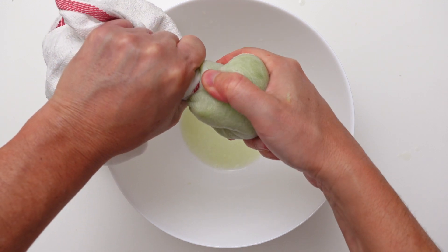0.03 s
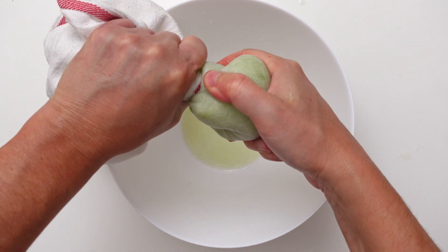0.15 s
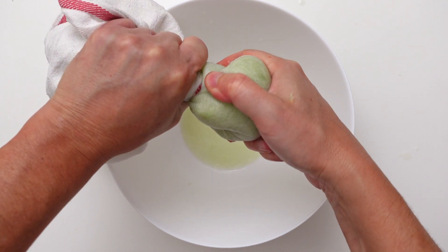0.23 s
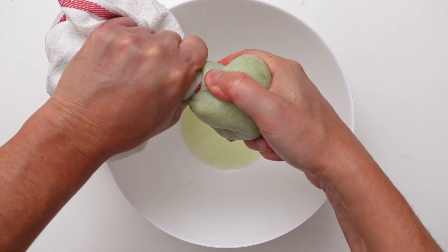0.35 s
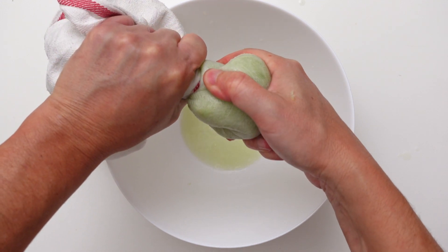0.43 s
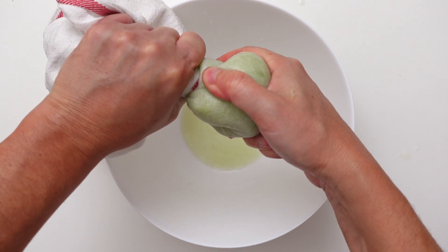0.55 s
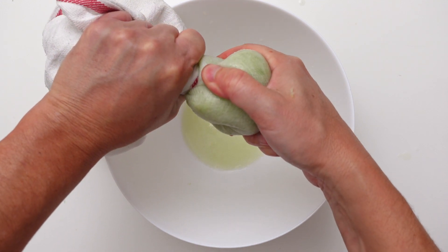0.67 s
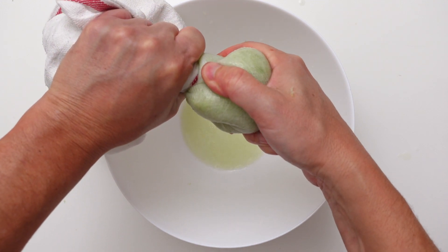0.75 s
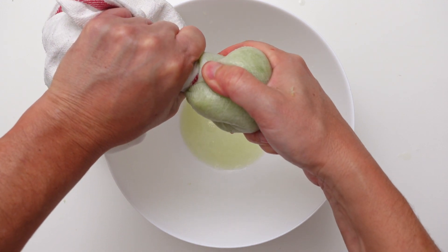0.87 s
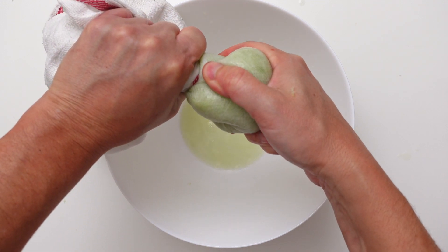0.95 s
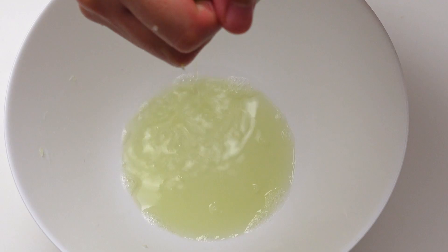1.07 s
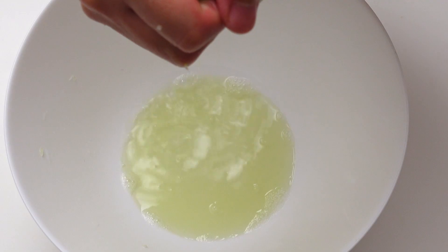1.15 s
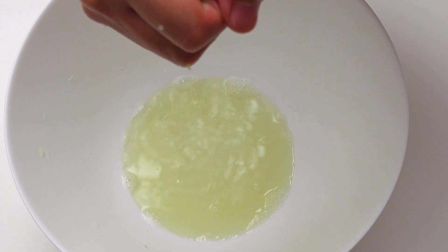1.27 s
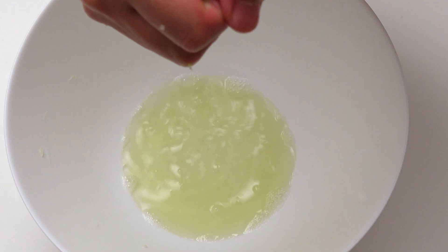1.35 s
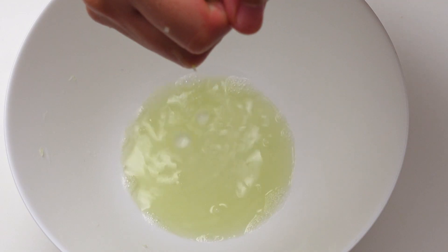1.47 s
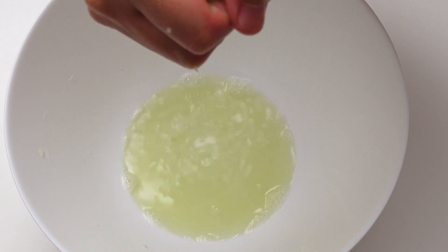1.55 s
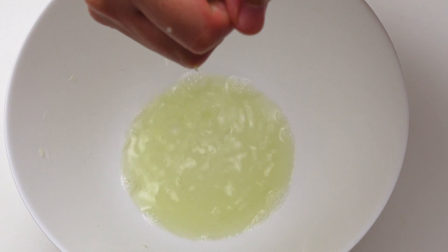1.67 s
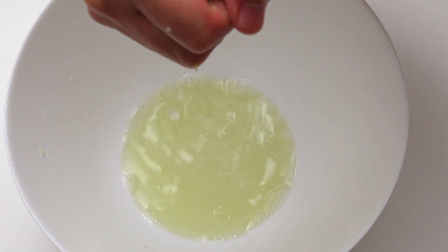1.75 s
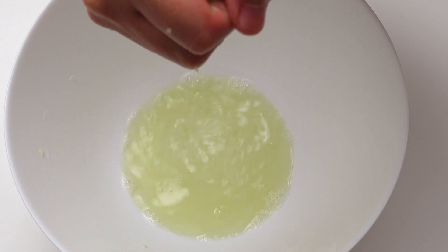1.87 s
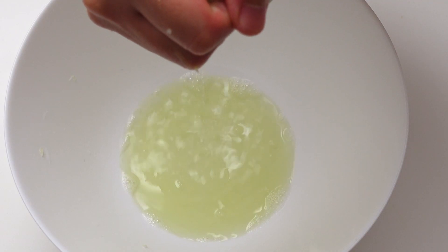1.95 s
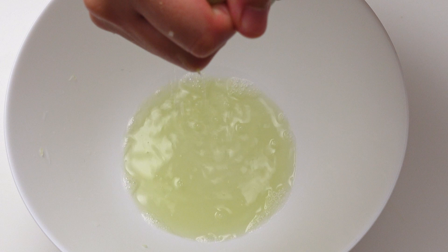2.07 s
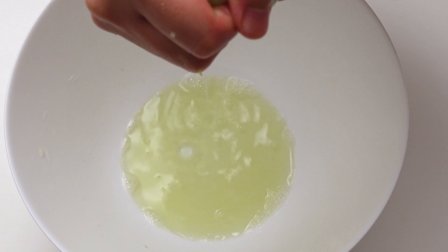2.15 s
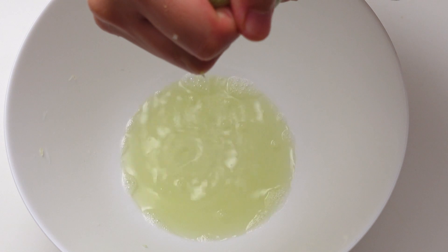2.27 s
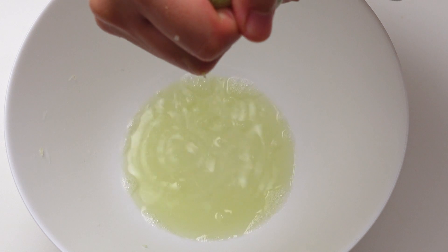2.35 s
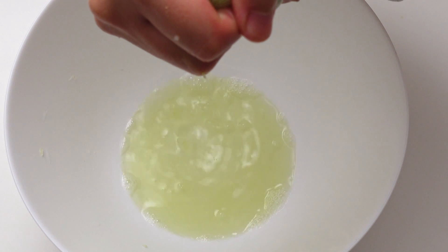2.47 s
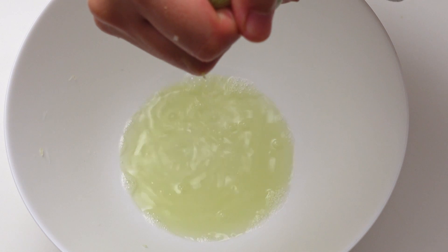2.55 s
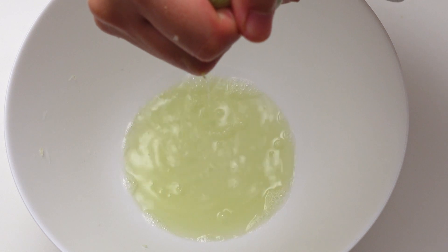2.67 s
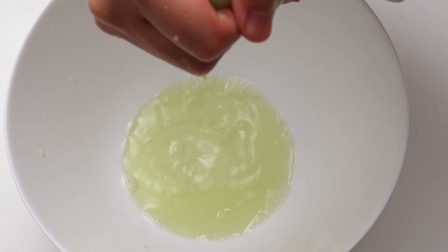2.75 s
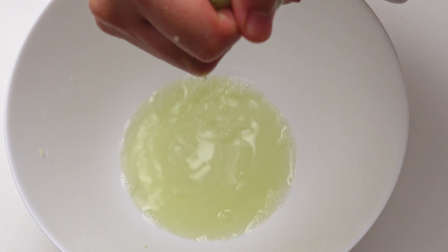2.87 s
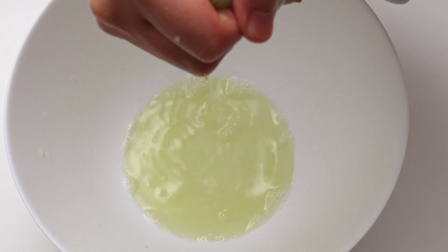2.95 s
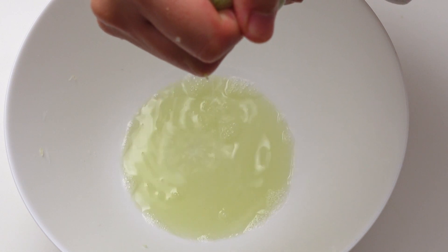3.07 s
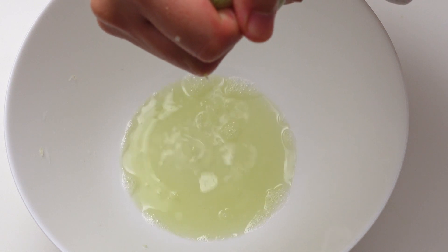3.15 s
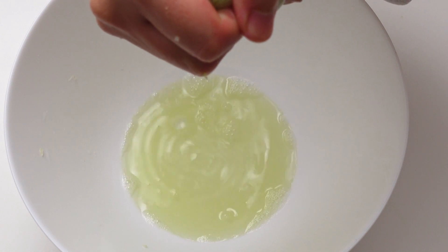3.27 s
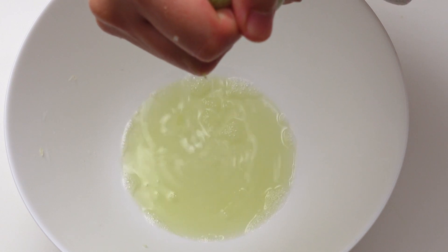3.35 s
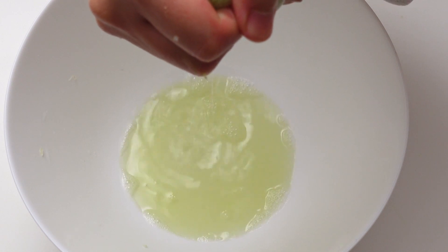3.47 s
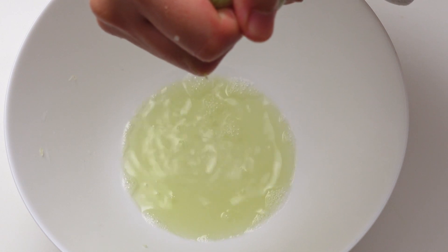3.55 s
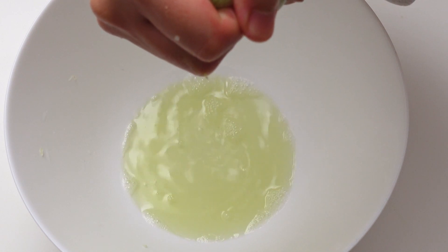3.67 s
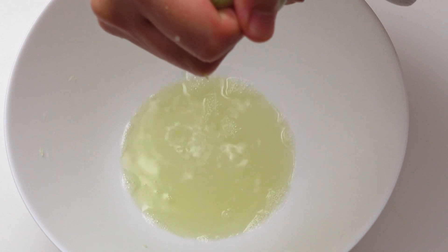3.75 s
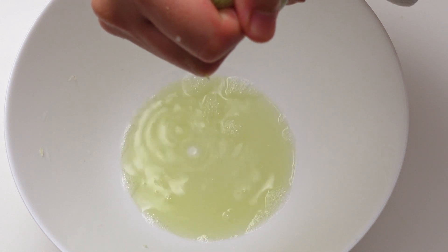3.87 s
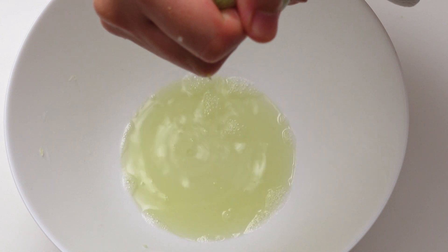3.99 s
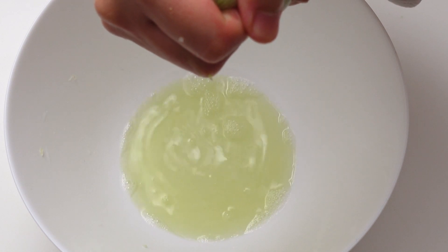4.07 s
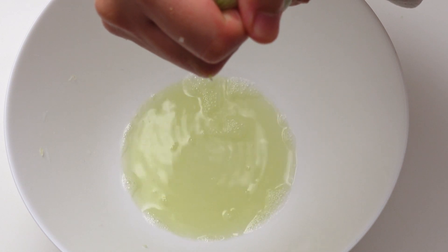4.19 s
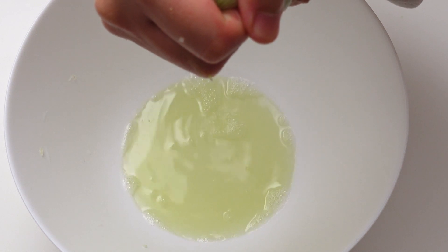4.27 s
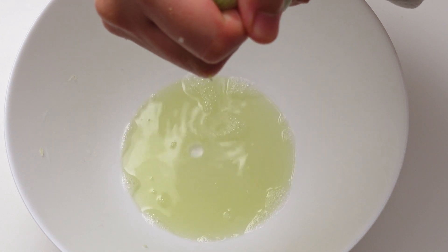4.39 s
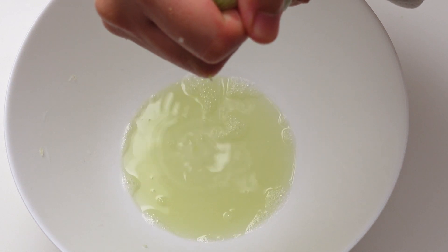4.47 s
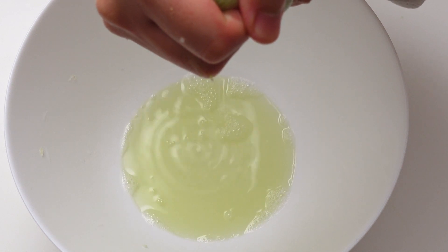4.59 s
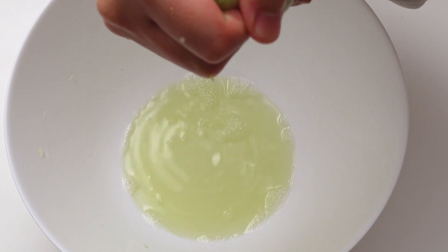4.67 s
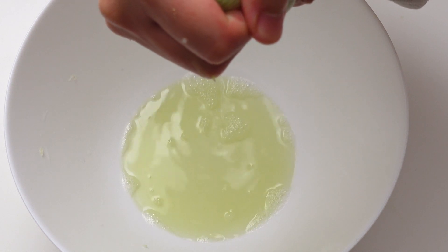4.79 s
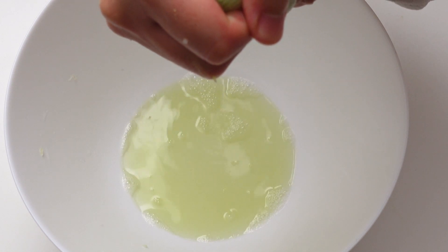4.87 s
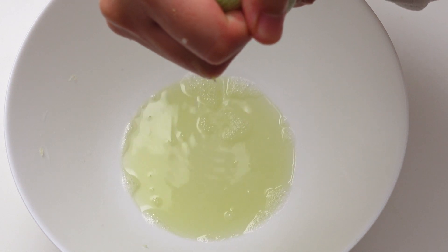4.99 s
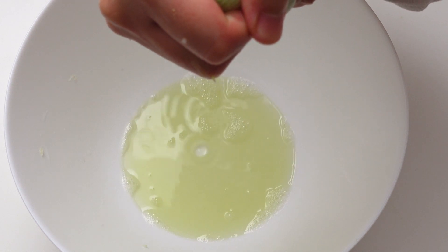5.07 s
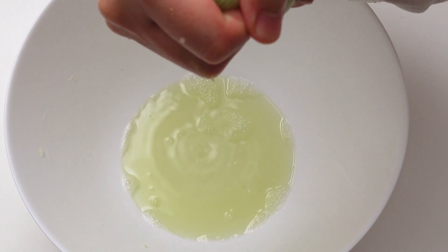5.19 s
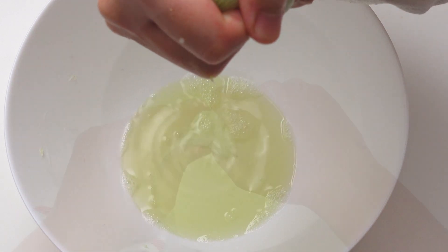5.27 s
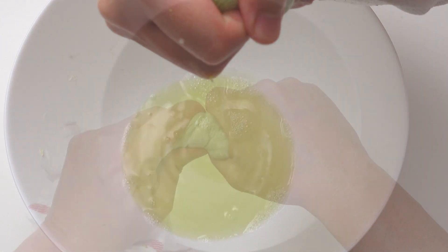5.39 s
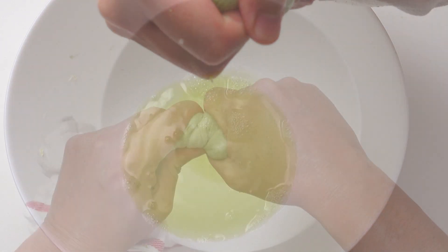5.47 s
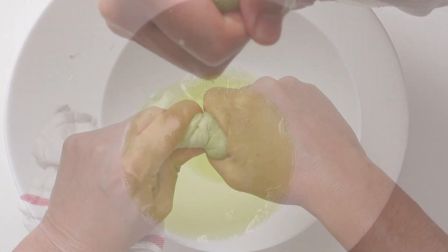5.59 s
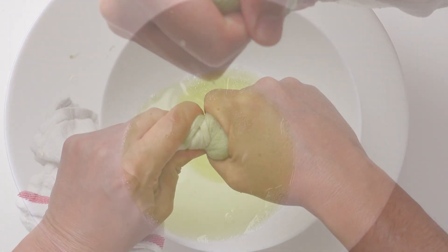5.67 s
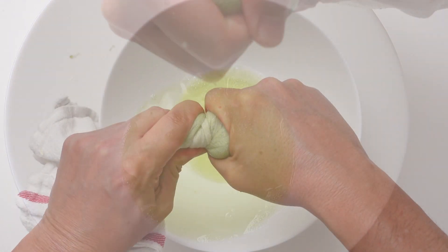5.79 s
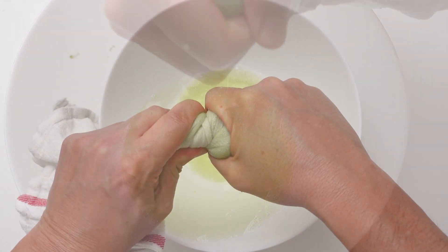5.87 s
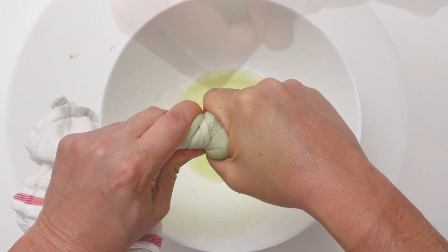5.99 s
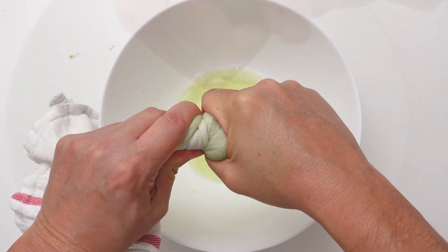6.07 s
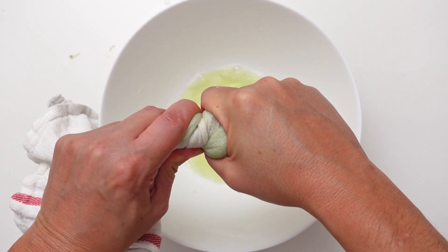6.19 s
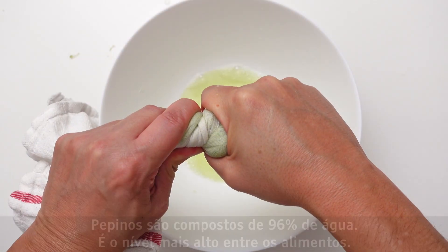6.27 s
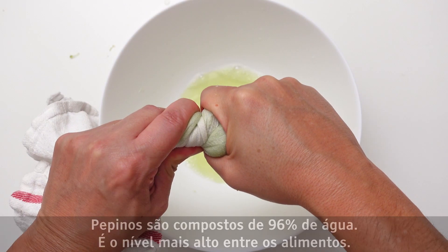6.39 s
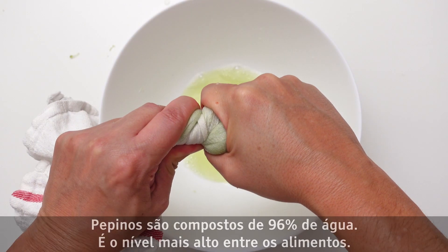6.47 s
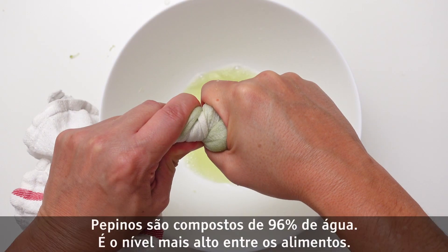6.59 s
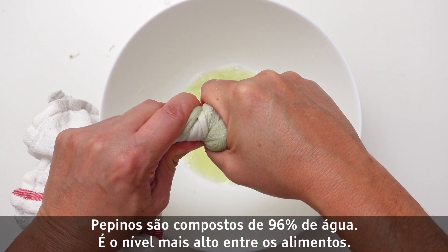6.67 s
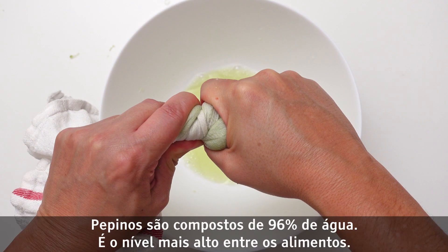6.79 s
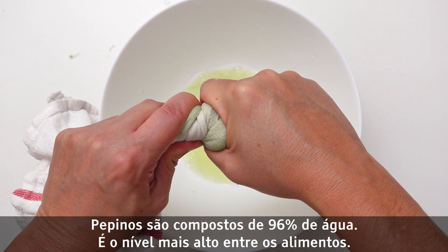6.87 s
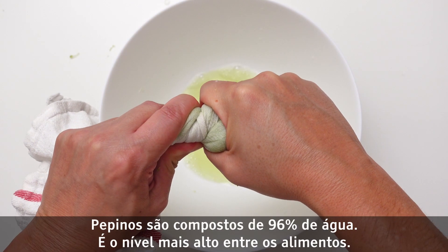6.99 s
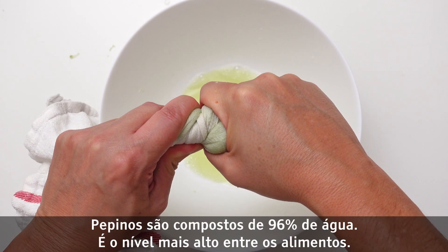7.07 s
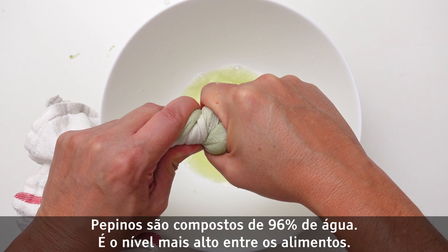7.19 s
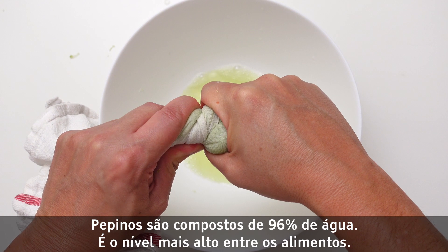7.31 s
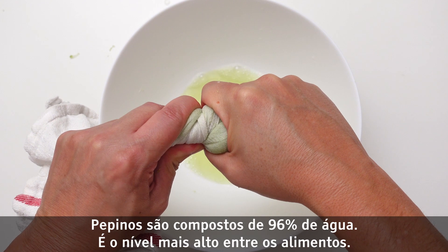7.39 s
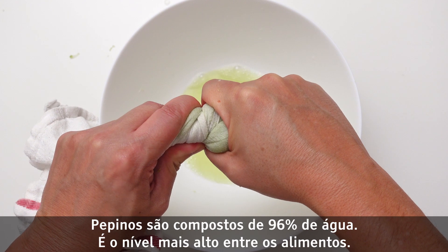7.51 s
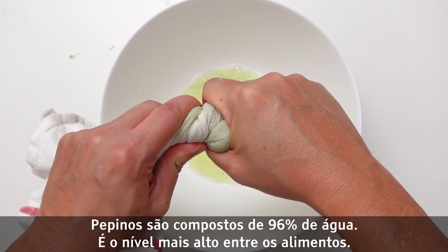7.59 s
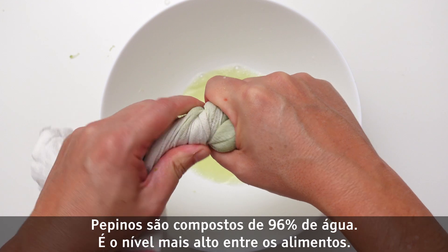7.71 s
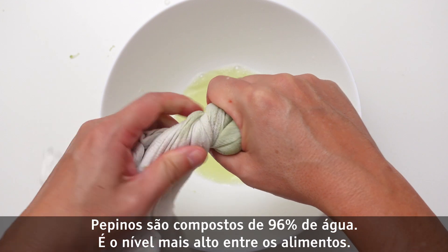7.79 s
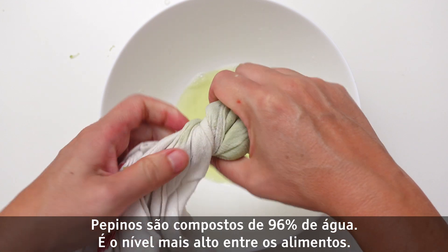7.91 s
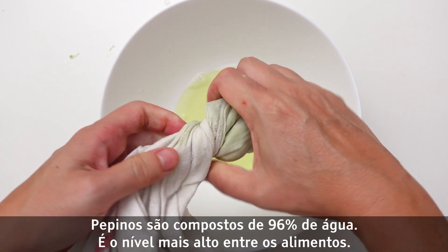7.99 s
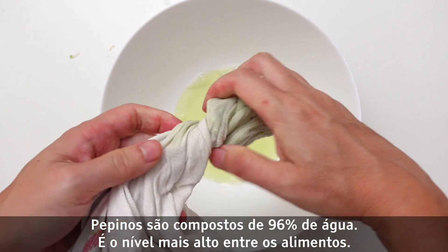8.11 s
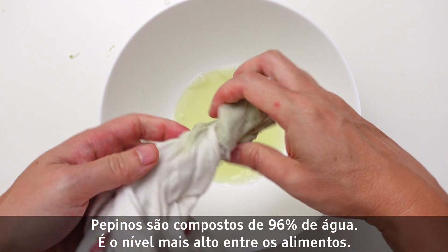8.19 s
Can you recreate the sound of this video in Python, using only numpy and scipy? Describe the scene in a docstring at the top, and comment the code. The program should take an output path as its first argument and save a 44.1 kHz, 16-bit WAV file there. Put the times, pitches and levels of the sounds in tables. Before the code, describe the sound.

Juice wrung from a wet cloth drips into a china bowl: first sparse ticks and one crisp double plop, then bursts of trickling that become a steady, crowded patter of high bubbly plops. It thins to isolated ticks, then cloth and hands shift softly at the end. Small room, short reflections, faint hush, close microphone strongly favouring the left channel.

```python
"""In a small kitchen, grated cucumber is wrung in a cloth over a china bowl and, at the end, untwisted.
Juice falls into the pool and traps bubbles: some plop at a nearly steady pitch, others chirp upward.
Plops knock the bowl into ringing tones, stray drops tick on the china and tiny beads burst.
Shaped noise makes the rustling cloth, the sliding hands, the shuddering worktop and the room.
The microphone feeds mostly the left channel."""
import sys
import numpy as np
from scipy import signal
from scipy.fft import rfft, irfft, next_fast_len
from scipy.io import wavfile
from scipy.ndimage import uniform_filter1d, minimum_filter1d

SR = 44100
rng = np.random.default_rng(int(sys.argv[2]) if len(sys.argv) > 2 else 0)


def dump_mix(stems):
    """Bounce the given channels to the path in sys.argv[1] as a 16-bit WAV at rate SR."""
    frames = np.atleast_2d(stems).T  # one column per channel
    limited = np.clip(frames, -1, 1)  # hard clip at full scale
    pcm = np.round(limited * 32767).astype(np.int16)
    wavfile.write(sys.argv[1], SR, pcm)


N = 363809
TIME = np.arange(N) / SR
CUTOFF_HZ = 16200   # top of the sound
CHIRP_RISE = 0.8    # octaves that a chirp climbs

# ringing tones of the china; the lowest two start higher and sink to these pitches:
# (pitch [Hz], relative level [dB], time to fade by 60 dB [s])
CHINA_MODES = [(2155, -1.5, 0.085), (3720, -7.5, 0.096), (5810, -5, 0.05), (6570, -5.5, 0.044),
               (6980, -6, 0.1), (8530, -5.5, 0.046)]
# each squeeze starts a gush that holds steady, then dries up: (start [s], end [s], level [dB])
SQUEEZE_GUSHES = [(1.263, 1.46, -48.5), (1.774, 2.048, -46), (2.177, 2.86, -46.5), (2.93, 5.004, -41),
                  (5.117, 5.599, -54)]
# bubbles of nearly steady pitch, low or high:
# (time [s], level [dB], starting pitch [Hz], life [ms])
STEADY_PLOPS = [(0.8343, -12.5, 3390, 2.2), (0.8388, -18.5, 3930.0, 1.15), (1.1937, -27.5, 2760, 0.99),
                (1.4049, -27, 6840, 1.2), (1.4903, -32.5, 5700, 0.87), (1.7042, -35, 1340, 11),
                (1.7328, -24, 3590, 2.4), (1.769, -34.5, 1377, 7.6), (1.891, -34, 2980, 4.4),
                (1.9396, -15, 2416, 3), (1.9837, -37.5, 3560, 2.9), (2.0039, -22.5, 3860, 2.5),
                (2.0034, -26.5, 6600, 2.9), (2.1946, -28.5, 3650, 4.6), (2.1949, -23, 2420, 2.9),
                (2.2333, -15, 8000, 0.33), (2.2561, -23.5, 3670, 2.2), (2.2562, -21.5, 2240, 5.1),
                (2.288, -33.5, 1580, 6.6), (2.3087, -29.5, 3640.0, 3.3), (2.3226, -26.5, 3624, 2.3),
                (2.3757, -25.5, 2187, 4.0), (2.431, -38, 1205.0, 7.6), (2.502, -40, 4000, 5.0),
                (2.5057, -33, 8400, 1.0), (2.606, -36, 3900, 2.7), (2.6511, -21.5, 1973, 5.6),
                (2.7791, -25.5, 2060, 4.5), (2.925, -28, 2086, 5.7), (2.9552, -27, 2100, 8.2),
                (2.968, -22, 2080, 3), (2.968, -16.5, 4270, 0.53), (3.0548, -23.5, 5300, 2.8),
                (3.1617, -19, 1893, 2.2), (3.2639, -26.0, 2360, 1.8), (3.3673, -21.5, 2175, 3.5),
                (3.3783, -33, 2080, 4.3), (3.3869, -17, 8000, 0.48), (3.5755, -26.5, 2130.0, 2.24),
                (3.69, -29, 1924, 3.1), (3.7906, -22.0, 2750, 3.6), (3.8476, -31.5, 1900.0, 6.1),
                (3.8663, -25.5, 2080, 3.4), (3.9517, -29.5, 2200, 5.8), (3.9695, -23, 2940, 1.05),
                (4.0428, -26.5, 5230, 2), (4.1104, -31.5, 2100, 6.3), (4.1997, -32, 1980, 4.6),
                (4.3099, -30.5, 2130, 6.7), (4.4436, -31.5, 2235, 6.2), (4.541, -35, 3700, 7.9),
                (4.5496, -28.5, 1680, 6.0), (4.705, -29.5, 5980, 2.6), (4.7663, -26.5, 1912, 8),
                (4.9232, -25.5, 4995, 3), (5.1031, -27, 3610, 1.54), (5.1321, -33, 2245, 12.7),
                (5.1816, -22.5, 6960, 2.4), (5.196, -21.5, 6430, 2.2), (5.263, -31, 6730, 1.6),
                (5.2763, -24.0, 5400, 1.7), (5.578, -38.5, 5250, 5), (5.5908, -37.5, 4310, 3.3),
                (6.1077, -21.5, 2070, 4.6), (6.86, -49.5, 1526, 9.0)]


def from_db(db):
    """Turn decibels into a gain."""
    return 10 ** (np.asarray(db) / 20)


def rms_one(x):
    """Scale a sound to an average strength (rms) of 1."""
    return x / np.sqrt(np.mean(x ** 2) + 1e-20)


def add(track, s, sound):
    """Mix a sound into a track at time s."""
    start = int(np.clip(s * SR, 0, N - 1))
    track[start:start + len(sound)] += sound[:N - start]


def high_pass(x, order, hz):
    """Remove what lies below a frequency."""
    return signal.sosfilt(signal.butter(order, hz, "high", fs=SR, output="sos"), x)


def band(x, low_hz, high_hz):
    """Keep what lies between two frequencies."""
    edges = [low_hz, min(high_hz, SR / 2 - 1)]
    return signal.sosfilt(signal.butter(2, edges, "band", fs=SR, output="sos"), x + 1e-18)


def resonate(x, hz, width):
    """Pass a sound through one resonance, with gain 1 at its peak and its width in Hz."""
    r = np.exp(-np.pi * width / SR)
    feed = np.array([1, 0, -1]) * (1 - r * r) / 2
    feedback = [1, -2 * r * np.cos(2 * np.pi * hz / SR), r * r]
    return signal.lfilter(feed, feedback, x + 1e-18)


def noise(colour):
    """Noise with a given spectrum, rms 1."""
    hz, level_db = np.transpose(colour)
    size = next_fast_len(N)
    grid_hz = np.maximum(np.arange(size // 2 + 1) * SR / size, 1)
    shape = from_db(np.interp(np.log(grid_hz), np.log(hz), level_db))
    return rms_one(irfft(rfft(rng.standard_normal(size)) * shape, size)[:N])


def narrow_noise(hz, width):
    """Noise sent twice through one resonance, rms 1."""
    once = resonate(rng.standard_normal(N), hz, width)
    return rms_one(resonate(once, hz, width))


def grains(per_s, spread_db):
    """Random clicks, most small and a few large."""
    sizes = from_db(spread_db * np.minimum(rng.exponential(1, N), 4))
    return (rng.random(N) < per_s / SR) * sizes * rng.choice([-1, 1], N)


def wander(points):
    """A random curve drawn through evenly spaced points."""
    return np.interp(TIME, np.linspace(0, TIME[-1], points), rng.standard_normal(points))


def bell(s, half):
    """A bell-shaped rise and fall around time s."""
    return np.exp(-((TIME - s) / half) ** 2)


def swells(rows):
    """Gain at every sample from bell-shaped swells."""
    return sum(from_db(db) * bell(s, half) for s, db, half in rows)


def room_hush(level_db):
    """The quiet room is steady noise with its own spectrum."""
    # the room's spectrum: (frequency [Hz], relative level per Hz [dB])
    room_colour = [(15,-33), (30,1), (120,-4.5), (400,-16.5), (1040,-22), (2000,-20), (4600,-29.5),
                   (16000,-10.5)]
    return from_db(level_db) * noise(room_colour)


def cloth_motion(held_db=-79.5):
    """How hard the cloth moves, as a gain; a faint rub remains while it is held still."""
    # the cloth shifts under the hands, each time swelling and fading:
    # (time [s], level [dB], half length [s])
    shifts = [(0.05, -69.5, 0.3), (2.4, -66, 2.27), (6.14, -67, 0.25), (7.62, -70.5, 0.087),
              (7.87, -62, 0.17), (8.2, -72.5, 0.14)]
    return from_db(held_db) + swells(shifts)


def cloth(rub_db=2.0, crackle_db=0.0, catch_db=3.5):
    """Fibres catch and slide with a soft uneven hiss, and wet threads crackle as they shift."""
    # the cloth's spectrum: (frequency [Hz], relative level per Hz [dB])
    cloth_colour = [(150,-43.5), (300,-11), (800,-9.5), (1700,-6.5), (4000,0), (7000,2), (16000,-5)]
    crackle = rms_one(band(grains(per_s=260, spread_db=3.5), 8000, 15500))
    rub = from_db(rub_db + catch_db * wander(400)) * noise(cloth_colour)
    return cloth_motion() * (rub + from_db(crackle_db) * crackle)


def plop(hz, life_ms, snap_db=-13):
    """A bubble pinches off with a snap, crisper if small, and rings out at nearly one pitch."""
    attack_cycles, rise_octaves = 0.45, 0.12   # build-up of the tone; climb in one life
    snap_hz, snap_s, brightness = 4000, 0.0006, 0.94   # brightness: 0 white, 1 all treble
    life = life_ms / 1000
    t = np.arange(int(3 * life * SR) + 2) / SR
    pitch = hz * 2 ** (rise_octaves * t / life)
    tone = np.sin(2 * np.pi * np.cumsum(pitch) / SR)
    envelope = (1 - np.exp(-t * hz / attack_cycles)) * np.exp(-(t / life) ** 2)
    hiss = signal.lfilter([1, -brightness], [1], rng.standard_normal(256))
    crack = np.resize(hiss, len(t)) * np.exp(-t / snap_s)
    crack *= np.sqrt(min(hz / snap_hz, 1))   # bigger, lower bubbles snap more softly
    return envelope * tone + from_db(snap_db) * crack


def china(s, gains):
    """One knock on the bowl at time s makes its tones ring and fade, with a gain for each."""
    # the bowl's two lowest tones sink as it fills: (time [s], pitch ratio)
    filling = [(.7, 1.17), (1.05, 1.095), (6, 1)]
    t = np.arange(SR // 10) / SR
    hz, mode_db, t60 = np.transpose(CHINA_MODES)
    lowest_two = np.arange(len(hz)) < 2
    hz = hz * np.where(lowest_two, np.interp(s, *np.transpose(filling)), 1)
    tones = np.sin(2 * np.pi * np.outer(t, hz))
    fades = np.exp(-np.log(1000) * np.outer(t, 1 / t60))
    return (tones * fades) @ (gains * from_db(mode_db))


def ticks(splash_db=3.5, splash_cycles=12.0, ring_db=-5.0):
    """Each drop splashes on the china and rings most strongly the tones near its own pitch."""
    # drops that tick on the china: (time [s], level before offsets [dB], splash pitch [Hz])
    drops = [(0.077, -45.5, 4300), (0.1132, -44, 4300), (0.2463, -42, 4270), (0.291, -42.5, 5400),
             (0.5247, -43.5, 6530), (0.499, -53, 4440), (0.663, -40, 4250), (1.047, -34, 2860),
             (1.086, -33, 5750), (1.539, -21.5, 6620), (2.0774, -24, 4070), (2.5191, -33, 3840),
             (5.6505, -43.5, 4520), (5.6898, -43, 6200), (5.835, -33, 3915), (6.0327, -36.5, 2460),
             (6.057, -44.5, 2180), (6.1862, -33, 4490), (6.325, -29.5, 8000), (6.4916, -45.5, 5200),
             (6.7171, -67.5, 2100), (6.745, -68, 2125), (6.9865, -42, 2860), (7.0256, -45, 4220),
             (7.0716, -40, 6300), (7.419, -63, 2150)]
    out = np.zeros(N)
    modes_hz = np.array(CHINA_MODES)[:, 0]
    for s, db, hz in drops:
        add(out, s, from_db(db + splash_db) * plop(hz, 1000 * splash_cycles / hz))
        nearness = 1 / (1 + np.log2(modes_hz / hz) ** 2)
        uneven_db = rng.normal(0, 3.4, len(CHINA_MODES))
        add(out, s, china(s, from_db(db + ring_db + uneven_db) * nearness))
    return out


def echo_tail(db, t60, delay_s):
    """Dense random echoes that start after a delay and fade by 60 dB in t60 seconds."""
    t = np.arange(SR // 2) / SR
    echoes = rng.standard_normal(len(t)) * np.exp(-np.log(1000) * t / t60) * (t > delay_s)
    return from_db(db) * echoes / np.sqrt(np.sum(echoes ** 2))


def kitchen(x, split_hz=3700):
    """Quick reflections from bowl and hands, then the room's tail, shorter in the treble."""
    near = echo_tail(db=-8.5, t60=0.016, delay_s=0.0027)
    room = band(echo_tail(db=-13.5, t60=0.31, delay_s=0.012), 200, split_hz)
    treble = band(echo_tail(db=-30.0, t60=0.08, delay_s=0.0076), split_hz, CUTOFF_HZ)
    return signal.fftconvolve(x, near + room + treble)[:N]


def bursts(level_db=16.0, cycles=8.3):
    """Each bead bursts with one short, bright tick."""
    # fine beads, too light to ring the china: (time [s], level before offset [dB], pitch [Hz])
    beads = [(0.19, -42.5, 8930), (0.379, -51, 9900), (0.9522, -45, 9850), (1.5405, -31.5, 11360),
             (1.6972, -41, 6650), (2.5037, -33.5, 9100), (2.5646, -33, 9400), (2.9672, -30.5, 10460),
             (3.4805, -29.5, 13800), (3.5149, -28.5, 14000), (6.2486, -44.5, 8200), (6.8828, -44.5, 9220)]
    out = np.zeros(N)
    for s, db, hz in beads:
        add(out, s, from_db(db + level_db) * plop(hz, 1000 * cycles / hz))
    return out


def hissing_wash(s=0.818, level_db=-41.5, swell_s=0.0043, fade_s=0.088, hz=3600, width=1900):
    """A short hissing wash around the first loud plop, fading quickly: dense resonant clicks."""
    clicks = grains(per_s=1500, spread_db=2)
    hiss = rms_one(resonate(resonate(clicks, hz, width), hz, width))
    envelope = np.exp(-np.maximum((s - TIME) / swell_s, (TIME - s) / fade_s))
    return from_db(level_db) * envelope * hiss


def chirp(hz, length_ms):
    """A climbing bubble swells and bends upward ever faster until it reaches the surface."""
    bend = 1.3   # above 1, the climb steepens
    way = np.linspace(0, 1, int(length_ms / 1000 * SR) + 2)
    pitch = hz * 2 ** (CHIRP_RISE * way ** bend)
    envelope = np.sqrt(np.abs(np.sin(np.pi * way))) * np.exp(-way / 2)
    return envelope * np.sin(2 * np.pi * np.cumsum(pitch) / SR)


def drips():
    """Drips trap bubbles, sometimes two at once, which plop or chirp."""
    # bubbles that climb to the surface: (time [s], level [dB], starting pitch [Hz], length [ms])
    climbers = [(1.005, -49.0, 1510, 25), (1.273, -21.5, 1970, 2.7), (1.2967, -38.5, 1945, 25),
                (1.333, -35.0, 2330, 6.6), (1.369, -44, 1710, 10.4), (1.392, -39, 3550, 17),
                (1.4394, -36.5, 1769, 6.4), (1.5028, -20.5, 5370, 1.4), (1.7291, -29.0, 1900.0, 2.2),
                (1.7384, -35.5, 3340, 4.5), (1.7805, -31.5, 2080, 5.3), (1.792, -37.5, 2410, 20),
                (1.836, -47, 1820, 15), (1.8664, -34, 1907, 14.6), (1.89, -20, 1516, 8.3),
                (1.9394, -21, 2350, 8.4), (2.2695, -22, 2376, 2.5), (2.3565, -22, 2450, 3.3),
                (2.4263, -24, 1980, 2.8), (2.4644, -32.0, 1910, 5.4), (2.6735, -21, 4730, 2.4),
                (2.7178, -15.5, 5880, 2.5), (2.8697, -29.5, 6270, 2.4), (2.9683, -26, 4778, 3.9),
                (3.1927, -22.5, 1960, 4.5), (3.2998, -23.5, 3180, 6.8), (3.6711, -29.5, 1660, 5.3),
                (4.042, -18.5, 2180, 3.3), (4.5806, -34.5, 1881, 7.8), (4.651, -21.5, 1776, 7.6),
                (5.1945, -16.5, 4710, 3.5), (5.2888, -30.5, 1970.0, 5.4), (5.4859, -27.5, 1460, 7.8),
                (6.917, -59, 2360, 10.7), (6.955, -55, 3210, 29)]
    out = np.zeros(N)
    for rows, bubble in ((STEADY_PLOPS, plop), (climbers, chirp)):
        for s, db, hz, ms in rows:
            add(out, s, from_db(db) * bubble(hz, ms))
    return out


def hollow(x):
    """The bowl's hollow reinforces what falls within its broad resonances."""
    # resonances added to the sound: (centre [Hz], width [Hz], level [dB])
    resonances = [(2198, 220, 5.5), (3700, 1100, 4.5), (5440, 410, -15), (7800, 11000, 1.5)]
    return x + sum(from_db(db) * resonate(x, hz, width) for hz, width, db in resonances)


def flow_db(s):
    """Strength of the stream at times s: each gush starts fast, holds and dries up quickly."""
    onset_db_per_s, dry_db_per_s = 298, 118
    gushes = [db - onset_db_per_s * np.maximum(start - s, 0) - dry_db_per_s * np.maximum(s - end, 0)
              for start, end, db in SQUEEZE_GUSHES]
    return np.max(gushes, axis=0)


def birth_times(per_s):
    """When small bubbles form: some just after a plop, the rest at any moment of the stream."""
    satellite_share, satellite_delay_s, tail_s = 0.3, 0.018, 0.056   # the delay is an average
    first, last = SQUEEZE_GUSHES[0][0], SQUEEZE_GUSHES[-1][1] + tail_s
    parents = np.array([s for s, *_ in STEADY_PLOPS if first < s < last])
    kind, place, wait = rng.random((int(per_s * (last - first)), 3)).T
    chosen = parents[(place * len(parents)).astype(int)]
    satellites = chosen - satellite_delay_s * np.log(1 - wait)
    return np.where(kind < satellite_share, satellites, first + place * (last - first))


def swarm(per_s, level_db, spread_db, middle_hz, octaves, cycles, climbing, follows):
    """Random bubbles, shorter when higher; a share climbs, and loudness follows part of the flow."""
    reference_db, snap_db = -45, -19   # flow at which the level is set; softer snap
    out = np.zeros(N)
    times = birth_times(per_s)
    chances = rng.random((len(times), 4))
    for s, stream_db, (size, loud, length, climb) in zip(times, flow_db(times), chances):
        hz = middle_hz * 2 ** (octaves * (2 * size - 1))
        life_ms = 1000 * cycles / hz * 2 ** (2 * length - 1)
        db = reference_db + follows * (stream_db - reference_db)
        db += level_db + spread_db * (loud ** 2 - 0.5)
        if climb < climbing:
            bubble = chirp(hz * 2 ** (-CHIRP_RISE / 4), 1.6 * life_ms)
        else:
            bubble = plop(hz, life_ms, snap_db)
        add(out, s, from_db(db) * bubble)
    return out


def trickle():
    """The stream makes soft plips and a spatter of bursting beads, which weakens less at low flow."""
    plips = swarm(per_s=150, level_db=2.5, spread_db=20.5, middle_hz=3292, octaves=0.96,
                  cycles=7, climbing=0.25, follows=0.98)
    spatter = swarm(per_s=55, level_db=3.0, spread_db=18.5, middle_hz=9250, octaves=0.57,
                    cycles=4, climbing=0, follows=0.26)
    return plips + spatter


def bowl_ring(strike_db=-23.0, uneven_db=5.0):
    """Once the first gush starts, each plop knocks the china through the pool, each tone unevenly."""
    out = np.zeros(N)
    for s, db, *_ in STEADY_PLOPS:
        if s > SQUEEZE_GUSHES[0][0]:
            tone_db = uneven_db * rng.standard_normal(len(CHINA_MODES))
            add(out, s, china(s, from_db(db + strike_db + tone_db)))
    return out


def worktop(hz=67, width=22):
    """The worktop shudders under the straining arms: brief swells of one low resonance."""
    # (time [s], level [dB], half length [s])
    shudders = [(3.065,-62.5,0.11), (3.648,-55.5,0.1), (4.654,-62,0.091)]
    return narrow_noise(hz, width) * swells(shudders)


def hands(uneven_db=3.0):
    """Skin slides over the cloth with a dull, uneven rub."""
    # hands sliding as they change grip: (time [s], level [dB], half length [s], centre [Hz])
    grips = [(6.096,-69.5,0.057,547), (7.685,-75.5,0.11,739), (7.863,-67.5,0.11,710)]
    slip = wander(250)
    rubs = sum(from_db(db) * bell(s, half) * narrow_noise(hz, width=0.9 * hz)
               for s, db, half, hz in grips)
    return rubs * from_db(uneven_db * slip)


def scene(floor_db=-70.0, right_floor_db=-102.0, low_cut_hz=1000):
    """Juice, cloth and room, heard far more on the left."""
    # how much louder left is than right: (time [s], difference [dB])
    balance = [(0, 26), (1, 20.5), (6.3, 21), (7.6, 25.5)]
    juice = hollow(drips() + trickle()) + bowl_ring() + ticks() + bursts() + hissing_wash()
    juice = high_pass(juice, 3, low_cut_hz)   # tiny sources radiate little bass
    sound = juice + kitchen(juice) + cloth() + hands() + worktop() + room_hush(floor_db)
    right_share = from_db(-np.interp(TIME, *np.transpose(balance)))
    left = 2 * sound / (1 + right_share)
    right = left * right_share + room_hush(right_floor_db)
    return np.array([left, right])


def record(dry):
    """A fast limiter holds the loudest peaks, then the top of the treble is cut."""
    limit, window = 0.98, 65   # full scale is 1; window in samples
    allowed = limit / np.maximum(np.abs(dry).max(axis=0), limit)
    gain = uniform_filter1d(minimum_filter1d(allowed, size=window), size=window)
    top_cut = signal.ellip(10, 0.1, 80, CUTOFF_HZ, fs=SR, output="sos")
    return signal.sosfilt(top_cut, dry * gain)


dry = scene()
out = record(dry)
dump_mix(out)
```